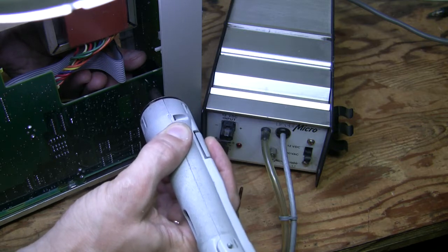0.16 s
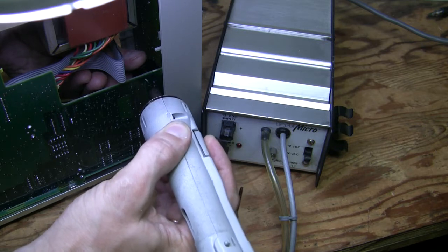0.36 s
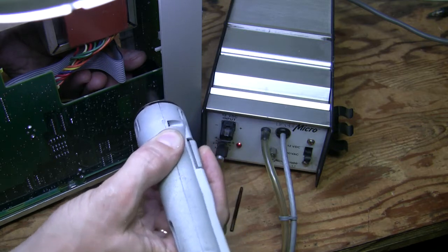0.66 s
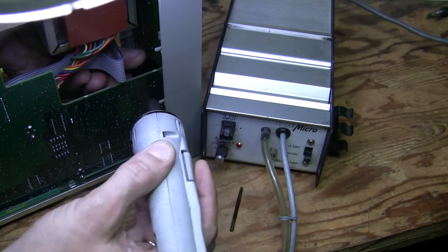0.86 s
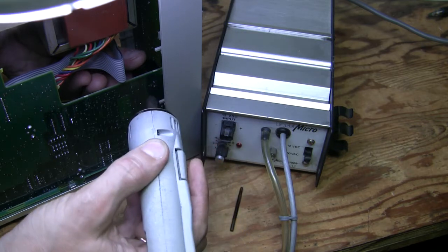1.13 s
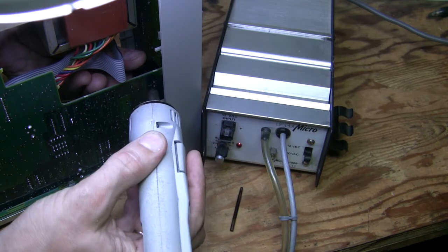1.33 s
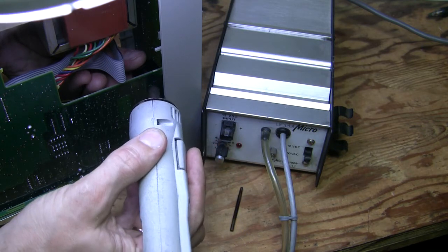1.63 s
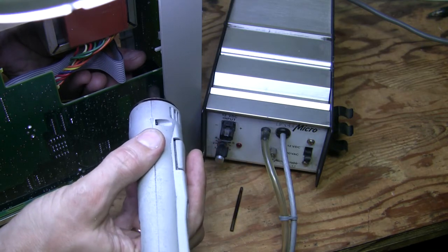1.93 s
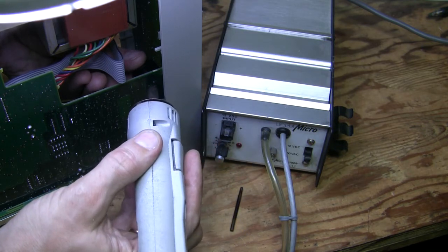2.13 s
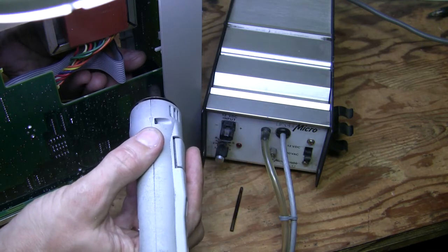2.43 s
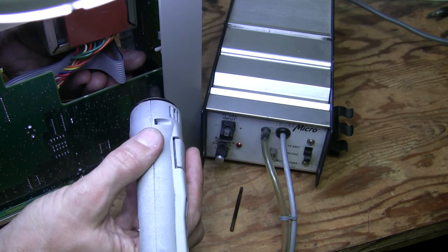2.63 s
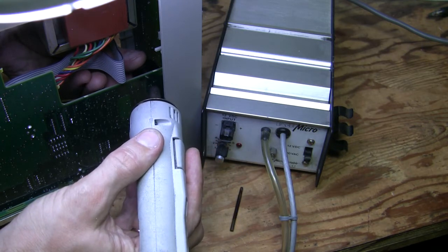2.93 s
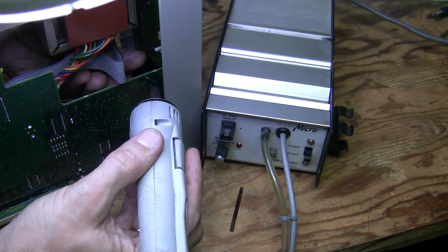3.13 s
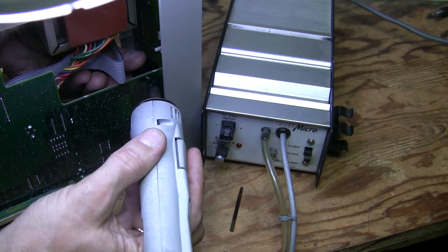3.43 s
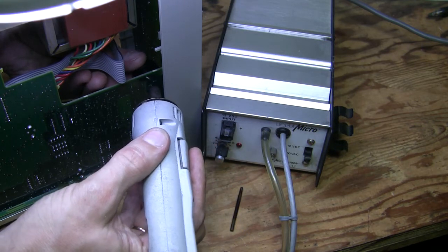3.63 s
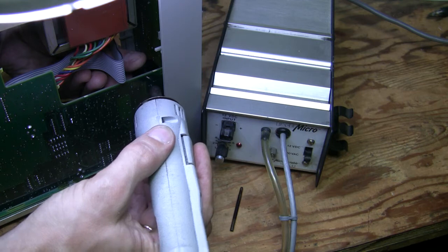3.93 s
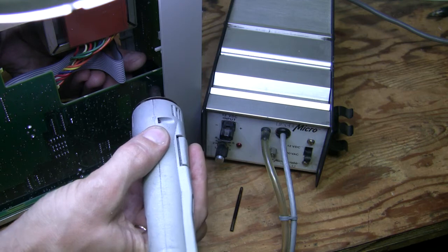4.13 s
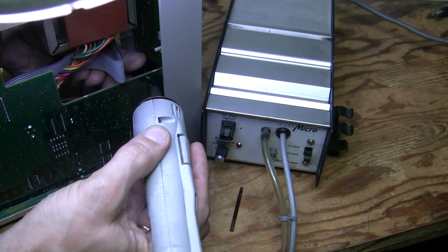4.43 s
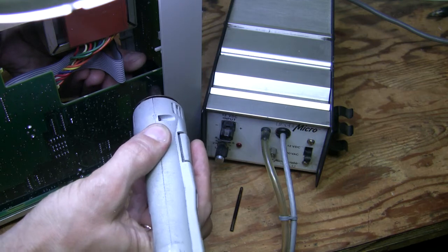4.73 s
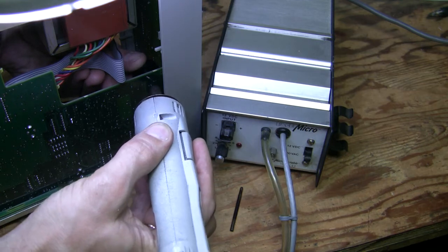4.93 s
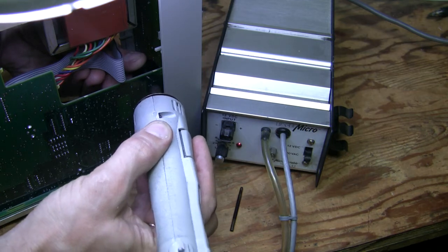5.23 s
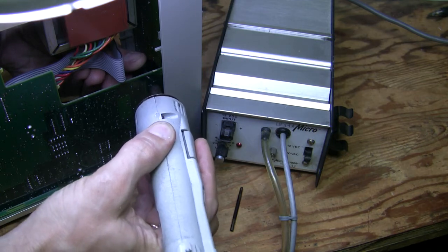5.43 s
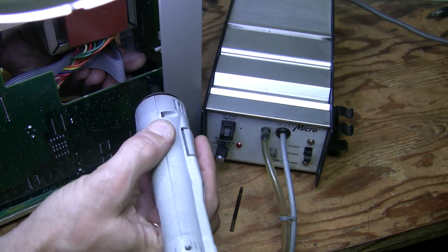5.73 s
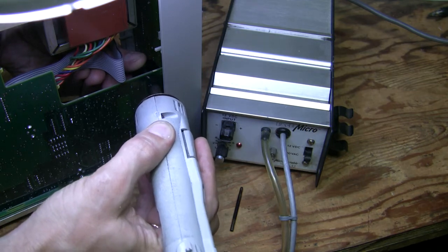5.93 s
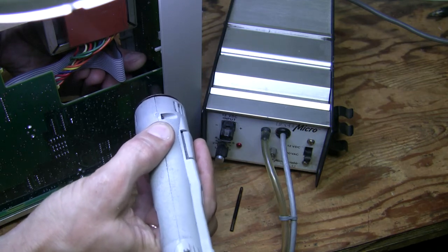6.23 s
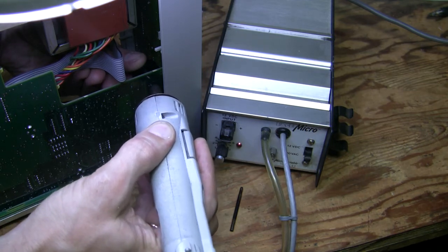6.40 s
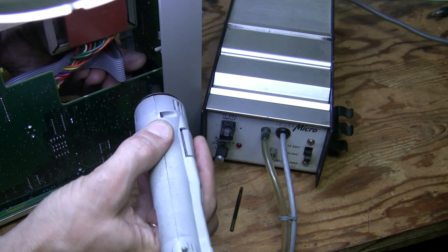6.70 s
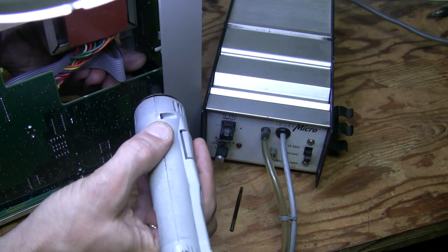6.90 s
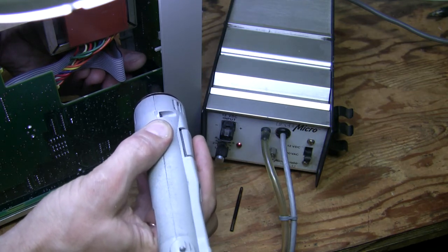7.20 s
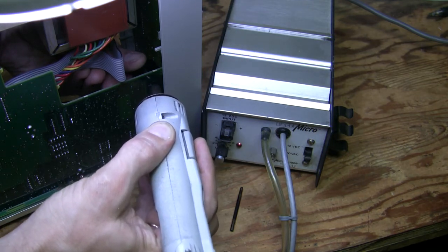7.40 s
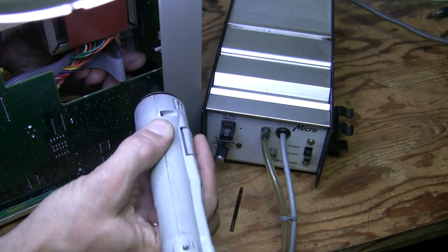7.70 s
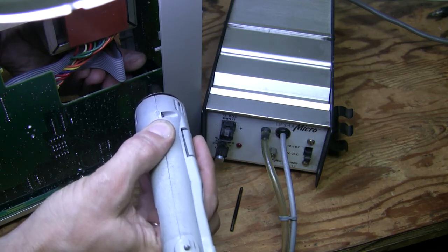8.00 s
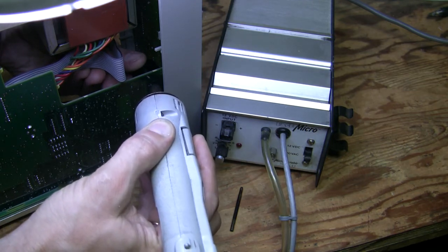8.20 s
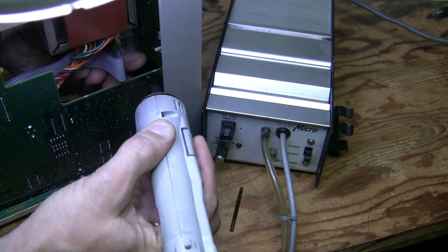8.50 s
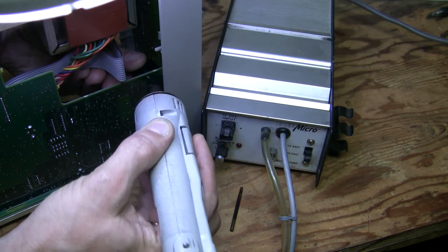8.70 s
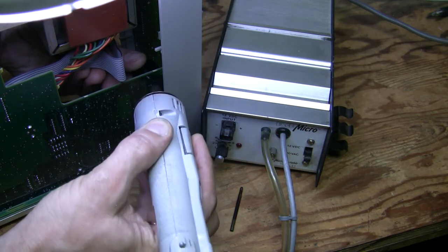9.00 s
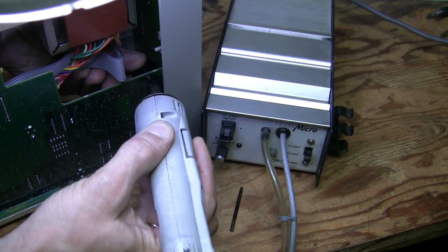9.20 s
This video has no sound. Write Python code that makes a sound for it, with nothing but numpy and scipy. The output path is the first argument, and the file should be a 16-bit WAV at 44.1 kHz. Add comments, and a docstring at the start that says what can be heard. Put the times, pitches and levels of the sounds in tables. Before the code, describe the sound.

A loud, steady pump buzz with rattling housing and airy hiss runs briefly, then cuts off with heavy knocks and a fast falling coast. Quiet room noise and a faint fan remain while a plastic handpiece ticks and creaks, soft bumps sound through the bench, and a nozzle scrapes grittily on a circuit board. A sharp click and knock restart the pump, higher and rougher. Close microphone in a small workshop.

```python
"""Desoldering station on a wooden bench

A vacuum pump buzzes, coasts to a stop and starts again seven seconds later.
Each stroke gives a pressure pulse (summed harmonics), a rattle of the housing and a puff of exhaust
hiss (noise and clicks timed by the strokes, coloured by resonances). In between, the plastic handpiece
ticks and creaks (coloured impulses) and its nozzle scrapes on a circuit board (gritty noise through
resonances). Bumps, knocks, hand rustle, room noise and a quiet fan complete the scene."""
import sys
import numpy as np
from scipy import signal
from scipy.fft import rfft, irfft
from scipy.io import wavfile
from scipy.ndimage import uniform_filter1d

SR = 44100
rng = np.random.default_rng(int(sys.argv[2]) if len(sys.argv) > 2 else 0)


def store_wav(level_fs):
    """Save 16-bit WAV to argv[1]."""
    pcm = np.round(np.clip(np.atleast_2d(level_fs), -1, 1) * 32767)
    wavfile.write(sys.argv[1], SR, pcm.T.astype(np.int16))


N = 412335


def amp(db):
    """Decibels to gain."""
    return 10 ** (np.asarray(db) / 20)


def unit(x):
    """Scales to rms 1."""
    return x / np.sqrt(np.mean(x ** 2) + 1e-20)


def peaked(x, size=130):
    """Scales the loudest few milliseconds to rms 1."""
    return x / np.sqrt(uniform_filter1d(x ** 2, size).max())


def blend(a, b, share):
    """Mixes two sounds so that b has this share of the power."""
    share = np.clip(share, 0, 1)
    return np.sqrt(1 - share) * unit(a) + np.sqrt(share) * unit(b)


def add(mix, s, sound):
    """Mixes a sound in at time s."""
    part = mix[max(round(s * SR), 0):][:len(sound)]
    part += sound[:len(part)]


def ramp(x, middle, span):
    """Rises from 0 to 1 over a span about the middle."""
    return np.clip(.5 + (x - middle) / span, 0, 1)


def drift(count, hz):
    """Slow chance of rms 1, up to about hz."""
    f = np.fft.rfftfreq(count, 1 / SR)
    return unit(irfft(rfft(rng.standard_normal(count)) * np.exp(-(f / hz) ** 2), count))


def slope(points):
    """A gain by frequency, joining (Hz, dB) points on a log axis."""
    hz, db = np.transpose(points)
    return lambda f: amp(np.interp(np.log(f + 1), np.log(hz), db))


def peaks(modes):
    """A gain by frequency, from steep-sided resonances (Hz, width Hz, dB) added in power."""
    def gain(f):
        return np.sqrt(sum(amp(db) ** 2 / (1 + ((f - hz) / width) ** 2 * 2) ** 2
                           for hz, width, db in modes))
    return gain


def causal(gain):
    """The minimum-phase response with these gains: it rings after its cause."""
    log_gain = np.log(np.maximum(gain, 1e-5))
    circle = np.concatenate([log_gain, log_gain[-2:0:-1]])
    return np.exp(signal.hilbert(circle).conj())[:len(gain)]


def colour(x, gain, size=4096):
    """Passes x through a body with the given gain by frequency."""
    response = irfft(causal(gain(np.fft.rfftfreq(size, 1 / SR))))
    return signal.oaconvolve(x, response)[:len(x)]


def reflections(x, wet_db, t60, size=12000):
    """Adds sparse, quickly dying echoes from the bench and the walls."""
    t = np.arange(size) / SR
    sparse = (rng.random(size) < .05) * (t > .002)
    taps = rng.choice([-1, 1], size) * sparse * amp(-60 * t / t60)
    return x + amp(wet_db) * signal.oaconvolve(x, taps / np.linalg.norm(taps))[:len(x)]


def ring(hz, db, t60, rise):
    """One struck mode: a decaying sine with a soft start."""
    t = np.arange(int(SR * t60) + 2) / SR
    return amp(db - 60 * t / t60) * (1 - np.exp(-t / rise)) * np.sin(2 * np.pi * hz * t)


def snap(t60, crisp, size=6000):
    """One sharp impulse, with share crisp of the power, on a short burst of dying noise."""
    chatter = rng.standard_normal(size) * amp(-60 * np.arange(size) / SR / t60)
    return blend(chatter, signal.unit_impulse(size), crisp)


def room(level_db=-51, swell_db=-2.15, swell_hz=6, rumble_hz=500):
    """Room noise: spectrally shaped noise whose part under rumble_hz swells slowly."""
    # noise spectrum of the room: [f/Hz, level/dB]
    room_colour = [(12, -42), (20, 0.5), (66, -1.5), (98, -11.5), (137, -4.5), (176, -13.5), (260, -4),
                   (454, -13), (600, -12), (794, -20.5), (863, -18), (1470, -24.5), (2170, -27),
                   (3380, -31.5), (15700, -31.5)]
    f = np.fft.rfftfreq(N, 1 / SR)
    air = unit(irfft(rfft(rng.standard_normal(N)) * slope(room_colour)(f), N))
    rumble = signal.sosfilt(signal.butter(1, rumble_hz, fs=SR, output="sos"), air)
    air = air + rumble * (amp(swell_db * drift(N, swell_hz)) - 1)
    return amp(level_db) * air


def fan(wander_hz=1.5, step=100):
    """Quiet fan: steady sines whose pitches wander independently."""
    # fan tones: [f/Hz, rms level/dB]
    fan_tones = [(258.4, -58), (333.8, -66), (360.7, -66), (597.5, -69), (672.9, -71), (888.2, -65.5),
                 (958.2, -77.5), (1540, -77.5), (7854, -91), (7881, -85)]
    frames = np.arange(N) / step
    out = np.zeros(N)
    for mean_hz, db in fan_tones:
        wander = unit(uniform_filter1d(rng.standard_normal(N // step + 2), size=40))
        hz = mean_hz + wander_hz * np.interp(frames, np.arange(len(wander)), wander)
        out += amp(db) * np.sqrt(2) * np.sin(2 * np.pi * np.cumsum(hz) / SR)
    return out


def handling():
    """Hands shifting on board and bench: lumpy low noise that swells and fades with each movement."""
    # rustle spectrum: [f/Hz, level/dB]
    rustle_colour = [(30, -16), (70, 5.5), (140, 3.5), (260, -8.5), (450, -9.5), (750, -14), (1300, -17),
                     (2300, -33), (6000, -38)]
    # movements: [middle t/s, length/s, level/dB]
    moves = [(1.25, 0.43, -58), (3.25, 0.46, -53.5), (4.3, 1.33, -56.5), (5.92, 0.16, -54),
             (7.35, 2.4, -54.5)]
    t = np.arange(N) / SR
    lumps = rng.standard_normal(N) * amp(4.4 * drift(N, 23))
    rustle = unit(colour(lumps, slope(rustle_colour)))
    return rustle * sum(amp(db) * np.exp(-2 * ((t - s) / length) ** 2) for s, length, db in moves)


def bumps():
    """Soft bumps through the bench: each strikes all bench modes, harder ones favouring the high modes."""
    # bench modes: [f/Hz, level/dB, t60/s]
    bench_modes = [(96, -14, 0.065), (139, -11, 0.066), (185.5, 1.5, 0.072), (241, 0.5, 0.064),
                   (746, -14, 0.04)]
    # bumps: [t/s, level/dB, hardness/(dB per octave)]
    bump_rows = [(.16, -23.5, 2), (1.236, -44, -12), (1.469, -41, -18), (3.243, -37.5, -2),
                 (5.814, -21, 1.5), (5.828, -22, -1), (5.936, -45.5, 13.5), (6.0, -34.5, -1),
                 (6.954, -37, -7), (7.171, -35, -3), (7.848, -40.5, 12.5)]
    out = np.zeros(N)
    middle_hz = np.median([mode[0] for mode in bench_modes])
    for s, db, hardness in bump_rows:
        for hz, mode_db, t60 in bench_modes:
            tilt_db = hardness * np.log2(hz / middle_hz)
            add(out, s, ring(hz, db + mode_db + tilt_db, t60, rise=0.0022))
    return out


def creaks(t60=0.034):
    """The grip slips and catches at a steady pace, swelling and fading; each slip rings the hollow handle."""
    # creaks: [t of hardest slip/s, peak level/dB, run-out/s]
    creak_rows = [(2.816, -49, 0), (4.299, -33.5, 0), (4.4917, -38, .06), (4.816, -43.5, 0),
                  (4.871, -35, .022), (5.002, -38, 0), (5.1, -40.5, 0), (5.934, -46, 0), (6.482, -51, 0)]
    # hollow handle resonances: [f/Hz, width/Hz, level/dB]
    handle_modes = [(540, 170, -1), (885, 510, -2), (1288, 86, 5), (1960, 200, -1), (2430, 520, -5),
                    (3520, 370, -15), (4200, 700, -22), (8000, 4000, -36)]
    slip_gap_s = .0134
    rise_db_per_s, fade_db_per_s = 450, 62
    lead_share = .75  # lead-in as a share of the run-out
    out = np.zeros(N)
    for s, db, run_out_s in creak_rows:
        slips = max(run_out_s, 0) / slip_gap_s
        for late_s in np.arange(-int(lead_share * slips), int(slips) + 1) * slip_gap_s:
            lost_db = max(fade_db_per_s * late_s, -rise_db_per_s * late_s)
            slip = peaked(colour(snap(t60, crisp=0.17), peaks(handle_modes)))
            add(out, s + late_s, amp(db - lost_db) * slip)
    return out


def scrapes(grain_db=3, vary_db=1.5, size=5000):
    """Nozzle rubbing round a pin: short swells of gritty friction noise ring the board and squeak."""
    # scrapes: [t/s, peak level/dB, squeak above 9 kHz/dB, length/s]
    scrape_rows = [(6.841, -50, -4, .024), (6.947, -48, -12, .014), (7.011, -44.5, 2, .024),
                   (7.173, -43, -11, .035), (7.334, -44, -4, 0.025), (7.43, -46.5, -6, 0.038),
                   (7.486, -43, -4, 0.019), (7.594, -45.5, -3, 0.026), (7.666, -41.5, -7, 0.018),
                   (7.774, -38, 0.5, .02), (7.841, -41, -5, .027), (7.957, -38.5, 0.5, 0.022)]
    # board and nozzle resonances: [f/Hz, width/Hz, level/dB]
    board_modes = [(775, 340, 0.5), (1350, 85, 6.5), (1970, 210, -3), (2560, 360, -2.5), (3500, 430, -6.5),
                   (4480, 860, -16), (8600, 2300, -16.5), (12200, 700, -12), (13600, 500, -7),
                   (15000, 700, -14)]
    out, t = np.zeros(N), np.arange(size) / SR
    for s, db, squeak_db, length_s in scrape_rows:
        u = 2 * t / length_s
        grit = rng.standard_normal(size) * amp(grain_db * drift(size, 800)) * u * np.exp(-u ** 2)
        # each point of contact stirs the modes differently
        modes = [(hz * rng.uniform(.97, 1.03), width, mode_db + vary_db * rng.standard_normal())
                 for hz, width, mode_db in board_modes]
        body, tilt = peaks(modes), slope([(5000, 0), (9000, squeak_db)])
        add(out, s, amp(db) * peaked(colour(grit, lambda f: body(f) * tilt(f))))
    return out


def faint_ticks(count=12):
    """Rows of faint ticks as the grip shifts, at random times and ring pitches."""
    return [(np.interp(when, (0, 1), (1.7, 7.5)), -57, np.interp(pitch, (0, 1), (2100, 4200)), -5, 0)
            for when, pitch in rng.random((count, 2))]


def ticks(ring_db=1):
    """Hard plastic and metal snap and chatter: impulses with their own short ring and brightness."""
    # trigger and handpiece ticks: [t/s, peak level/dB, ring f/Hz, level above 6.5 kHz/dB, chatter/s]
    tick_rows = [(0.8177, -36, 2920, -3.5, 0), (1.1303, -49, 7000, 1, 0), (1.2082, -36, 2090, -16, 0),
                 (1.2416, -50.5, 2150, -20, 0), (1.8502, -53, 2140, -20, 0), (2.5491, -51, 6900, 3, 0),
                 (3.25, -48.5, 2180, -26, 0), (3.7865, -37, 3100, 0.5, 0), (3.9986, -43, 3000, 0, 0),
                 (4.1515, -49, 3000, -4, 0), (4.748, -35.5, 3730, -5, .03), (4.9711, -43, 3820, -4, 0),
                 (5.0033, -40.5, 3710, -4, 0), (5.7825, -41, 2100, -4, 0), (5.8122, -27, 2600, -16.5, 0),
                 (5.8582, -40.5, 3840, 2, 0), (5.8955, -46.5, 3860, -8, 0), (6.2423, -44, 2300, -5, 0),
                 (6.5693, -42.5, 4140, -5, 0), (7.418, -46, 3900, -5, 0), (8.0402, -23, 2850, -10, 0)]
    # common tick spectrum: [f/Hz, level/dB]
    tick_colour = [(300, 4), (900, 5), (1500, -4.5), (2200, 0), (3000, -7), (3800, -1), (5000, -4),
                   (7000, -5.5), (10000, -9.5), (15000, -6.5)]
    base_low_db, low_db_per_db = -16, 0.83  # harder ticks carry more weight at the low end
    ring_db_per_db = 0.3  # the duller the touch, the more its ring stands out
    bounce_gap_s, bounce_fade_db, bounce_dulls_db = .0092, 1.5, 2  # each bounce is weaker and duller
    common = slope(tick_colour)
    usual_db = np.mean([row[1] for row in tick_rows])
    out = np.zeros(N)
    for s, db, hz, high_db, chatter_s in tick_rows + faint_ticks():
        low_db = base_low_db + low_db_per_db * (db - usual_db)
        part = peaks([(hz, hz / 6, ring_db - ring_db_per_db * high_db)])
        for k in range(int(chatter_s / bounce_gap_s) + 1):
            dull_db = k * bounce_dulls_db
            tilt = slope([(1000, low_db + dull_db), (2000, 0), (3300, 0), (6500, high_db - dull_db)])
            tick = colour(snap(t60=.035, crisp=0.07), lambda f: common(f) * tilt(f) * (1 + part(f)))
            add(out, s + k * bounce_gap_s, amp(db - k * bounce_fade_db) * peaked(tick))
    return out


def pump_knocks():
    """Heavy knocks as the pump jerks into motion or over its last strokes: one struck mode each."""
    # knocks: [t/s, level/dB, ring f/Hz, t60/s]
    knock_rows = [(.563, -14, 890, 0.082), (0.584, -11, 260, .066), (.607, -22, 1340, .04),
                  (.686, -21, 648, 0.07), (.72, -33, 920, .07), (.75, -25.5, 696, .065),
                  (.832, -37.5, 877, 0.097), (8.047, -7.5, 964, .035), (8.074, -17, 810, .027),
                  (8.083, -11, 734, .03)]
    out = np.zeros(N)
    for s, db, hz, t60 in knock_rows:
        add(out, s, ring(hz, db, t60, rise=0.0011))
    return out


def case_ring():
    """The metal case: one long-lived mode that sings on after the motor stops."""
    out = np.zeros(N)
    add(out, 0.03, ring(hz=799, db=-22, t60=1.68, rise=0.011))
    return out


def stroke(orders, smear=0.0632):
    """Complex harmonics of one pressure pulse that starts sharply and rings out; rms 1."""
    gain = amp([db for _, db in orders])
    pulse = causal(np.concatenate([gain[:1] / 2, gain, gain[-1:] / 2]))[1:-1]
    # the upper harmonics take longer to get out of the housing
    lag = np.exp(-1j * smear * np.arange(len(gain)) ** 2)
    return lag * pulse / np.sqrt(np.sum(gain ** 2) / 2)


def pressure_buzz(hz, turns, slow, load, light, heavy, waver, waver_hz, soften=0.34):
    """Pulse harmonics follow the strokes; a panel booms whenever one sweeps through its resonance."""
    boom_hz, boom_width_hz, boom_db = 698, 23, 7.3
    buzz = np.zeros(len(hz))
    for k, (a, b) in enumerate(zip(stroke(light), stroke(heavy)), 1):
        # the upper harmonics flutter most, and fade first at low speed
        flutter = 1 + waver * np.sqrt(k) * drift(len(hz), waver_hz)
        panel = 1 + amp(boom_db) * np.exp(-((k * hz - boom_hz) / boom_width_hz) ** 2)
        edge = np.exp(-soften * k * slow)
        harmonic = a + (b - a) * load  # suction reshapes the pulse
        buzz -= flutter * panel * edge * (harmonic * np.exp(2j * np.pi * k * turns)).real
    return buzz


def housing_rattle(puffs, clicks, knock_share, tinny_db):
    """Stroke-timed noise and clicks shake the housing, with echoes; rms 1."""
    # rattling housing spectrum: [f/Hz, level/dB]
    housing_colour = [(35, -42), (190, -21), (250, -11), (500, -14), (630, -3), (740, -3.5), (880, 2),
                      (1020, -6), (1200, -20), (1350, -9.5), (1650, -16.5), (2000, -16), (2350, -29.5),
                      (6000, -72)]
    shaking = blend(puffs * rng.standard_normal(len(puffs)), clicks, knock_share)
    body, tinny = slope(housing_colour), slope([(950, 0), (1350, tinny_db)])
    return unit(colour(reflections(shaking, wet_db=-8, t60=0.33), lambda f: body(f) * tinny(f)))


def exhaust_hiss(puffs, clicks, valve_share):
    """Echoing puffs of air noise and dry valve clicks excite the exhaust resonances; rms 1."""
    # exhaust resonances: [f/Hz, width/Hz, level/dB]
    exhaust_modes = [(2480, 540, -18.5), (3500, 373, -3), (4110, 250, -6), (4560, 230, -9.5),
                     (5157, 184, -4), (6080, 390, -1), (6770, 230, -9), (7420, 440, -7.5), (7890, 170, -13),
                     (8740, 1500, -20.5), (11240, 1600, -22.5), (12640, 830, -18.5), (14200, 600, -19.5),
                     (15380, 300, -19)]
    air = reflections(puffs * rng.standard_normal(len(puffs)), wet_db=-8.5, t60=0.061)
    return unit(colour(blend(air, clicks, valve_share), peaks(exhaust_modes)))


def pump(run, light, heavy, pulsing, jitter, waver, waver_hz, uneven_db, knock_share, valve_share,
         tinny_db, stumble=.65):
    """One run: buzz, rattle and hiss are all timed by the strokes of the pump."""
    t, hz, buzz_db, rattle_db, hiss_db, load = run
    count = len(t)
    # below full speed the rotor stumbles and the pulses lose their edge
    slow = np.clip(.97 - hz / hz.max(), 0, .4)
    unsteady = jitter * drift(count, 39) + stumble * slow * drift(count, 121)
    rate_hz = np.maximum(hz * (1 + unsteady), 1)
    turns = np.cumsum(rate_hz) / SR
    buzz = pressure_buzz(hz, turns, slow, load, light, heavy, waver, waver_hz)
    # a valve clicks once a stroke, and no two strokes are equally hard
    number = np.round(turns).astype(int)
    force, sway = rng.uniform(-1, 1, (number[-1] + 1, 2))[number].T
    samples_off = (turns - number) * SR / rate_hz
    clicks = np.sinc(samples_off) * np.exp(-(samples_off / 6) ** 2)
    # the air flow pulses once and twice a stroke, as intake and outlet puff
    flow = 1 + sum(depth * np.cos(2 * np.pi * k * turns) for k, depth in enumerate(pulsing, 1))
    hardness = amp(uneven_db * force)
    puffs = flow * hardness
    rattle = housing_rattle(puffs, clicks * sway, knock_share, tinny_db)
    hiss = exhaust_hiss(puffs, clicks * hardness, valve_share)
    return t[0], amp(buzz_db) * buzz + amp(rattle_db) * rattle + amp(hiss_db) * hiss


def loudness(t, speed, valves, levels, jolt):
    """Buzz, rattle and hiss (dB) grow with speed and with open valves; a jolt adds to the rattle."""
    buzz_db, rattle_db, hiss_db = (db + halving_db * np.log2(speed) - shut_db * (1 - valves)
                                   for db, halving_db, shut_db in levels)
    s, db, rise_db_per_s, fade_db_per_s = jolt
    jolt_db = db - np.maximum(rise_db_per_s * (s - t), fade_db_per_s * (t - s))
    return buzz_db, 20 * np.log10(np.hypot(amp(rattle_db), amp(jolt_db))), hiss_db


def running_down():
    """First run: full speed under full suction, then switched off, an exponential coast to rest."""
    # buzz, rattle, hiss: [full-speed level/dB, loss per halving of speed/dB, loss with valves shut/dB]
    sealed_levels = [(-13, 4.5, 23), (-29, 4.5, 11.5), (-34, 6.5, 14)]
    full_hz, off_s, coast_s, rest_s = 159.43, .553, .115, .8
    off_jolt = (0.59, -18, 350, 182)  # cutting power shakes the housing: t/s, dB, rise and fade dB/s
    unpowered_db, unpowered_s = -3.5, .03  # without power the strokes soon soften
    t = np.arange(0, rest_s, 1 / SR)
    coasting_s = np.maximum(t - off_s, 0)
    speed = np.exp(-coasting_s / coast_s)
    hz = full_hz * speed
    valves = ramp(hz, middle=41.7, span=24)  # Hz; around this stroke rate they stop opening
    buzz_db, rattle_db, hiss_db = loudness(t, speed, valves, sealed_levels, off_jolt)
    buzz_db = buzz_db + unpowered_db * np.minimum(coasting_s / unpowered_s, 1)
    return t, hz, buzz_db, rattle_db, hiss_db, 1


def starting_up():
    """Second run: the rotor closes in on its free speed; the choking nozzle then loads and slows it."""
    # buzz, rattle, hiss: [full-speed level/dB, loss per halving of speed/dB, loss with valves shut/dB]
    open_levels = [(-13.5, 6, 7.5), (-21, 0.5, 10), (-28.5, 6, 15.5)]
    free_hz, load_sag_hz, on_s, spin_up_s = 187.4, 5.4, 8.04, .035
    choke_s, choke_takes_s, load_open, load_choked = 8.82, 0.157, .24, .9  # suction load 0-1
    load_buzz_db, load_rattle_db = -1.5, 2.5  # full load trades buzz for rattle
    on_jolt = (8.048, -17, 3000, 650)  # the starting kick shakes the housing: t/s, dB, rise and fade dB/s
    t = np.arange(on_s, N / SR, 1 / SR)[1:]
    speed = 1 - np.exp(-(t - on_s) / spin_up_s)
    load = np.clip(load_open + (load_choked - load_open) * ramp(t, choke_s, choke_takes_s), 0, 1)
    hz = (free_hz - load_sag_hz * load) * speed
    valves = ramp(hz, middle=161.2, span=3.5)  # Hz; around this stroke rate they open
    buzz_db, rattle_db, hiss_db = loudness(t, speed, valves, open_levels, on_jolt)
    return t, hz, buzz_db + load_buzz_db * load, rattle_db + load_rattle_db * load, hiss_db, load


def scene():
    """The pump runs smoothly with the nozzle sealed, and roughly the second time."""
    # stroke harmonics, nozzle sealed: [multiple of stroke rate, level/dB]
    sealed_orders = [(1, -9), (2, -2), (3, -13), (4, -1.5), (5, 1.5), (6, 5.5), (7, -18.5), (8, -5),
                     (9, -23), (10, -11), (11, -19), (12, -15), (13, -20.5), (14, -33.5), (15, -39.5),
                     (16, -26), (17, -27.5), (18, -38.5), (19, -29.5), (20, -32), (21, -46), (22, -16),
                     (23, -20.5), (24, -25.5), (25, -38), (26, -18.5), (27, -37), (28, -27.5), (29, -28)]
    # stroke harmonics, nozzle open: [multiple of stroke rate, level/dB]
    open_orders = [(1, -4.5), (2, 2.5), (3, 0.5), (4, 2), (5, 4), (6, -20), (7, -0.5), (8, -7), (9, -14.5),
                   (10, -12.5), (11, -21.5), (12, -32), (13, -31), (14, -39), (15, -26)]
    # stroke harmonics, nozzle half choked: [multiple of stroke rate, level/dB]
    choked_orders = [(1, -13.5), (2, -5.5), (3, -8.5), (4, -22.5), (5, 1), (6, -12), (7, -10), (8, -18.5),
                     (9, -30.5), (10, -34), (11, -29), (12, -32), (13, -35), (14, -31), (15, -43)]
    touches = ticks() + creaks() + scrapes() + bumps() + pump_knocks() + case_ring()
    mix = room() + fan() + handling() + reflections(touches, wet_db=-11, t60=0.13)
    # pulsing: depth of the air flow's swing once and twice a stroke
    add(mix, *pump(running_down(), sealed_orders, sealed_orders, pulsing=(.22, 0), jitter=.0015,
                   waver=0.017, waver_hz=22, uneven_db=2, knock_share=0.107, valve_share=0.067,
                   tinny_db=2.5))
    add(mix, *pump(starting_up(), open_orders, choked_orders, pulsing=(.08, .33), jitter=0.00441,
                   waver=0.14, waver_hz=24.2, uneven_db=1.5, knock_share=0.14, valve_share=0.095,
                   tinny_db=0))
    return mix[None]


def record(dry):
    """Band limit: a steep linear-phase low-pass."""
    edge_hz = 15800
    low_pass = signal.firwin(2047, edge_hz, window=("kaiser", 9), fs=SR)
    return signal.oaconvolve(dry, low_pass[None], "same")


dry = scene()
out = record(dry)
store_wav(out)
```